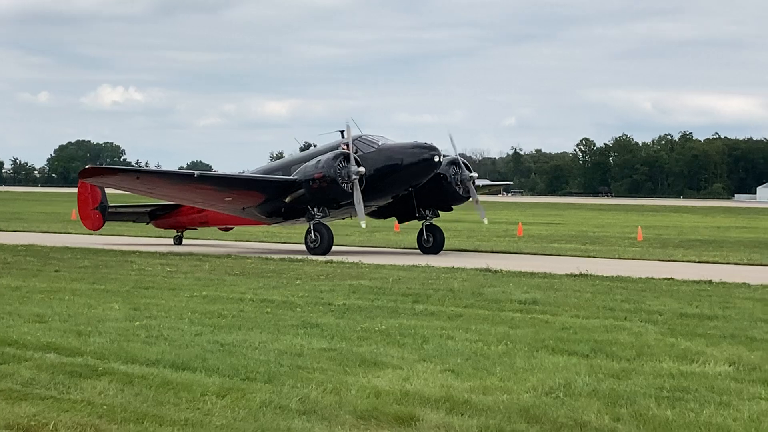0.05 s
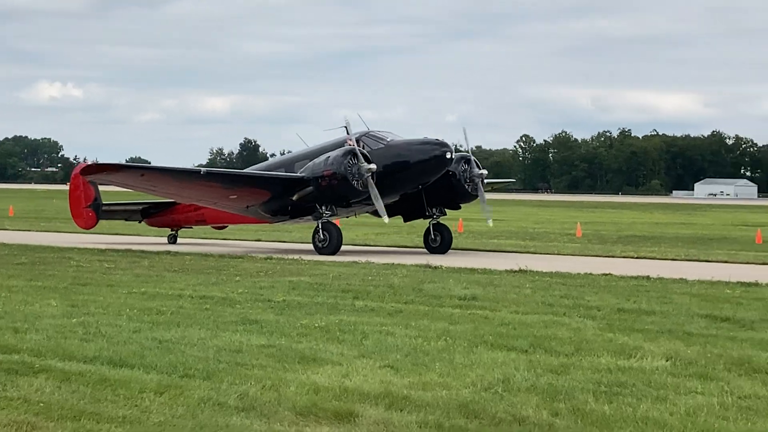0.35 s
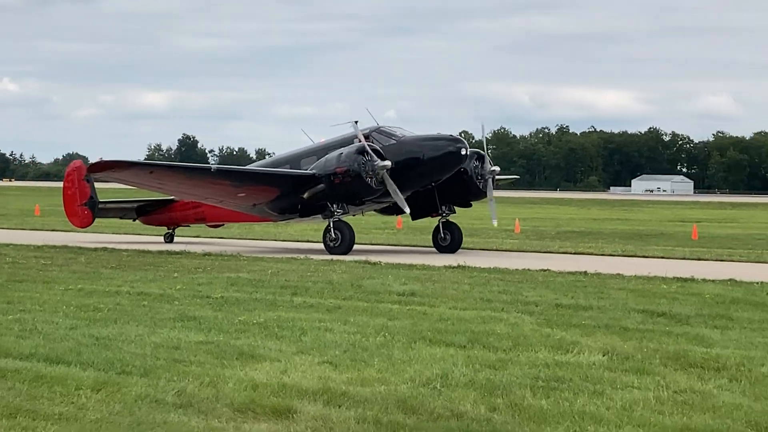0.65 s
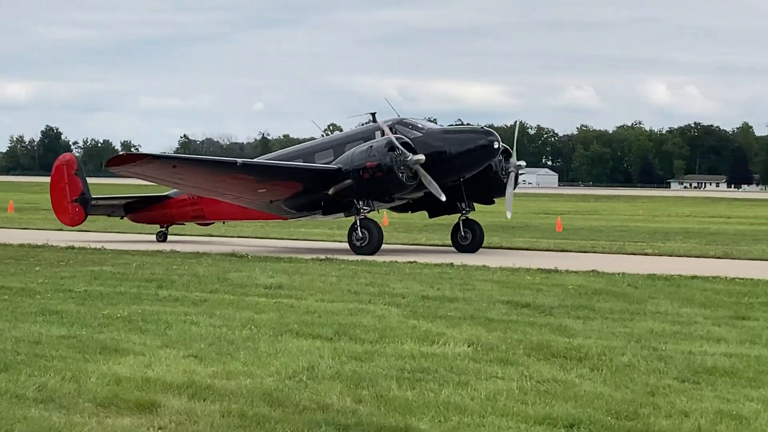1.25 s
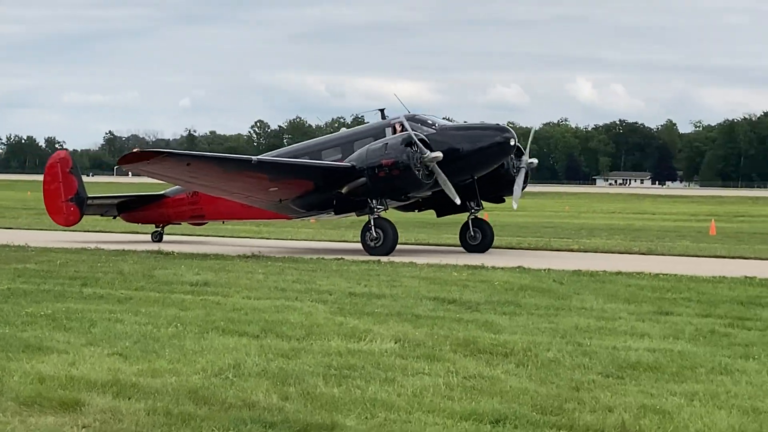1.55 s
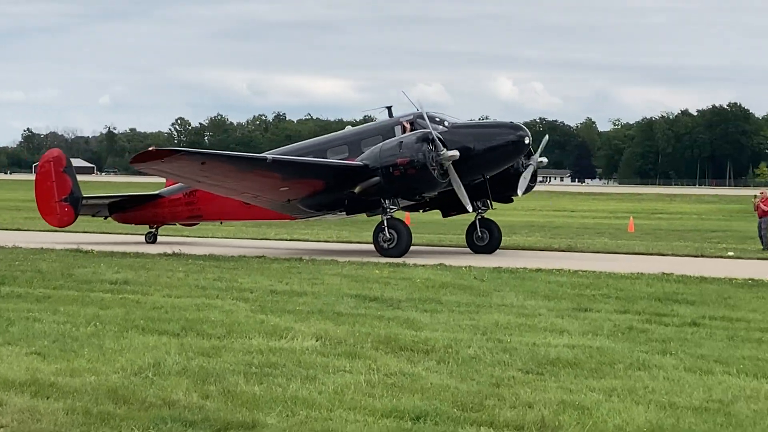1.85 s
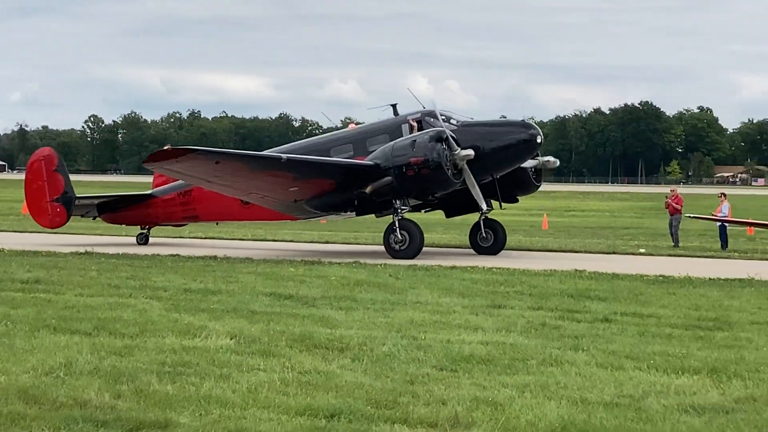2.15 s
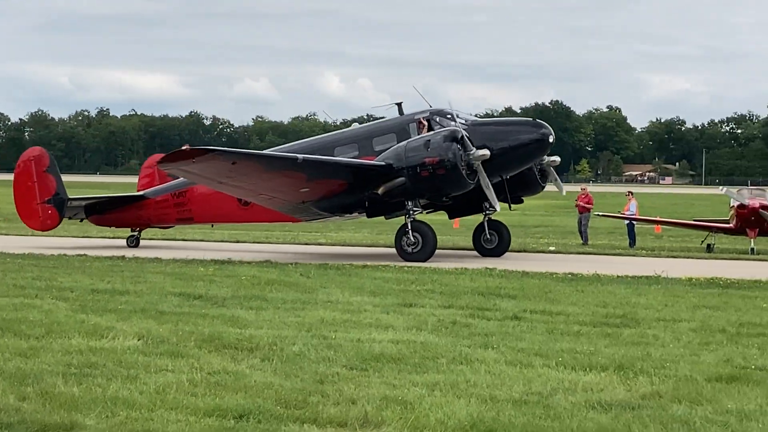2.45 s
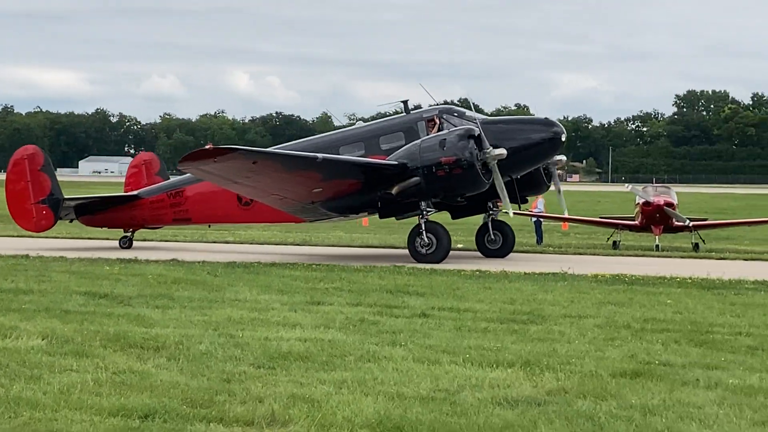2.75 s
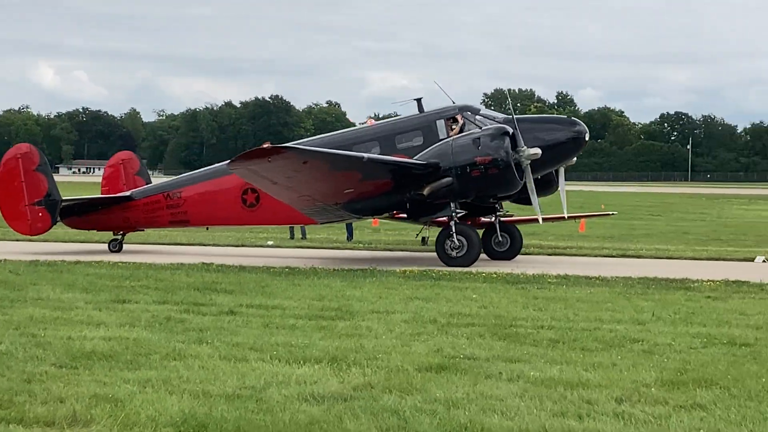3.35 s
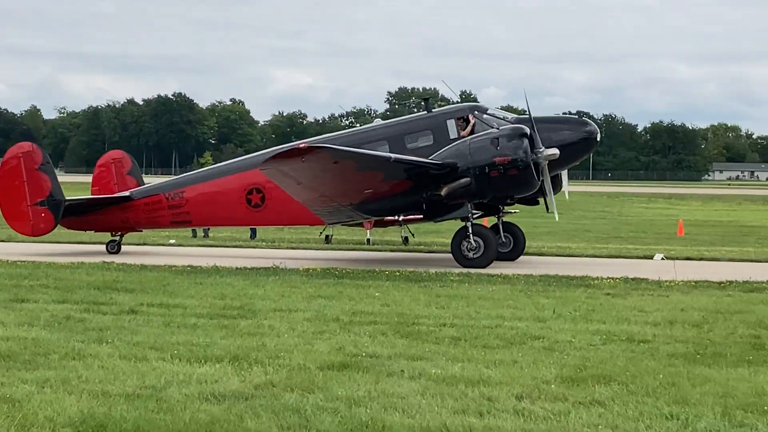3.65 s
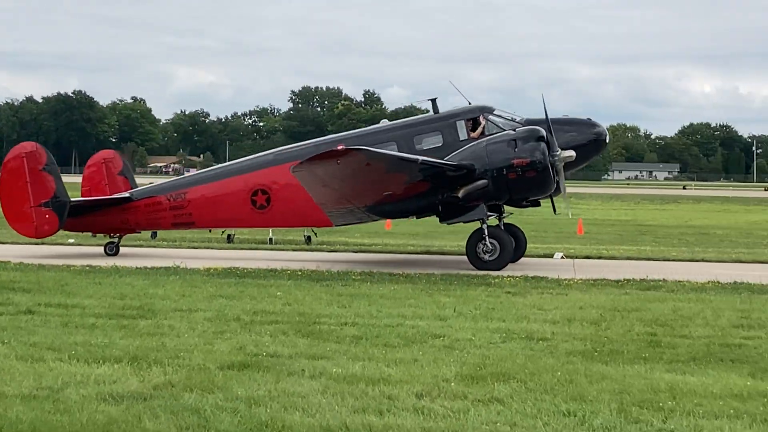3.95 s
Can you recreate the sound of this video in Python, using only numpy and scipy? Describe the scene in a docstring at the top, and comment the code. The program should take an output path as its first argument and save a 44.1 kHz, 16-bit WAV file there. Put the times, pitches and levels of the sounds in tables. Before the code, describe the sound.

A twin-engine propeller plane taxis past, its piston engines rumbling, chuffing and spitting.

```python
"""Two nine-cylinder radial engines idle at different speeds as a propeller aircraft taxis past.
Their uneven exhaust pulses excite pipe resonances and beat into a loping rumble. The near exhaust
chuffs at every firing, and spits and rasps more as its outlet turns towards the microphone.
Behind it the valve gear clatters, loose metal clanks and propeller air washes over the open airfield."""
import sys
import numpy as np
from scipy import signal
from scipy.fft import rfft, irfft, next_fast_len
from scipy.io import wavfile
from scipy.ndimage import uniform_filter1d

SR = 44100
rng = np.random.default_rng(int(sys.argv[2]) if len(sys.argv) > 2 else 0)


def digitize_waveform(pressure):
    """Quantize a signal to 16-bit integers and store it at the path in sys.argv[1].

    Rows of a 2-D input are taken as channels; values are limited to [-1, 1].
    """
    field = np.atleast_2d(pressure).T
    bounded = np.clip(field, -1, 1)
    quanta = np.round(bounded * 32767).astype(np.int16)
    wavfile.write(sys.argv[1], SR, quanta)


N = 176400
T = np.arange(N) / SR
LEAD = SR // 2  # lead-in: the engines are already running
M = next_fast_len(N + 2 * LEAD, True)
HZ = np.fft.rfftfreq(M, 1 / SR)


def amp(db):
    """Decibels to amplitude ratio."""
    return 10 ** (np.asarray(db) / 20)


def unit(x):
    """Normalisation to rms 1."""
    return x / np.sqrt(np.mean(x ** 2) + 1e-20)


def along(points):
    """Interpolation on a logarithmic frequency axis."""
    hz, values = np.transpose(points)
    return np.interp(np.log(HZ + 1), np.log(hz + 1), values)


def noise(spectrum):
    """Spectral shaping: white noise filtered to a given colour."""
    return unit(irfft(rfft(rng.standard_normal(M)) * amp(along(spectrum)), M)[:N])


def stereo_noise(spectrum, side_db):
    """Partial coherence: direct sound is common to both sides, scattered sound differs."""
    return unit(noise(spectrum) + amp(side_db) * np.outer([1, -1], noise(spectrum)))


def narrow_band(hz, width_hz):
    """Modulation: slow noise broadens a sine into a fuzzy metallic tone."""
    fuzz = noise([(0, 0), (width_hz / 2, 0), (width_hz * 2, -30), (width_hz * 10, -80)])
    return unit(fuzz * np.sin(2 * np.pi * np.cumsum(hz + np.zeros(N)) / SR))


def patchy(x, depth_db):
    """Passing resonances: a smooth random gain over frequency and time."""
    frames = signal.stft(x, nperseg=1024)[2]
    swell = uniform_filter1d(rng.standard_normal(frames.shape[1:]), size=7, axis=0)
    swell = unit(uniform_filter1d(swell, size=4, axis=1))
    return unit(signal.istft(frames * amp(depth_db * swell), nperseg=1024)[1][:, :N])


def resonate(x, spectrum):
    """Minimum-phase resonance with the given spectrum; drops the lead-in."""
    cepstrum = irfft(np.log(amp(along(spectrum))), M)
    cepstrum[1:M // 2] *= 2
    cepstrum[M // 2:] = 0
    return irfft(rfft(x, M) * np.exp(rfft(cepstrum)), M)[LEAD:LEAD + N]


def pulses(times, sizes):
    """Impulse train with lead-in, each impulse shared between two samples."""
    at = np.clip(times * SR + LEAD, 0, M - 2)
    i = at.astype(int)
    return np.bincount(i, sizes * (1 - at + i), M) + np.bincount(i + 1, sizes * (at - i), M)


def puffs(times, sizes, rise_s, t60_s):
    """Incoherent addition: the envelope of decaying puffs whose powers sum."""
    t = T[:SR // 4]
    shape = (1 - np.exp(-(t / rise_s) ** 2)) * np.exp(-np.log(1000) * t / t60_s)
    power = signal.fftconvolve(pulses(times, sizes ** 2), (shape / shape.max()) ** 2)
    return np.sqrt(np.abs(power[LEAD:LEAD + N]))


# Engine speeds (time [s], firing rate [Hz])
NEAR_RATE = [(0.0, 46.85), (0.5, 46.27), (1.0, 46.13), (1.5, 45.1), (2.0, 45.35), (2.5, 45.39),
             (3.0, 44.78), (3.5, 45.4), (4.0, 45.38)]
FAR_RATE = [(0.0, 52.95), (0.5, 52.67), (1.0, 52.37), (1.5, 52.62), (2.0, 51.98), (2.5, 51.33),
            (3.0, 51.77), (3.5, 51.26), (4.0, 51.66)]
def firings(rate, cylinders=9):
    """Phase is the integral of rate: each whole cycle gives a firing time and its cylinder."""
    t = np.arange(-LEAD, N) / SR
    cycles = np.cumsum(np.interp(t, *np.transpose(rate))) / SR
    cycles -= cycles[LEAD]
    count = np.arange(np.ceil(cycles[0]), cycles[-1]).astype(int)
    return np.interp(count, cycles, t), count % cylinders


# Spectrum of propeller air (frequency [Hz], relative level [dB])
WASH_SPECTRUM = [(20, -6), (100, -32), (400, -2), (700, -2), (1400, -3.5), (3000, -2.5), (6000, -18),
                 (15000, -48)]
def propeller_wash(level_db=-38, db_per_s=0.24):
    """Diffuse field: the noise of propeller air rises as the aircraft nears."""
    return amp(level_db + db_per_s * (T - T.mean())) * stereo_noise(WASH_SPECTRUM, side_db=-1.5)


# Spectrum of the valve gear (frequency [Hz], relative level [dB])
VALVE_SPECTRUM = [(200, -2.5), (500, -9.5), (800, -11.5), (1000, -2), (1280, 3), (1480, -3), (1700, 2.5),
                  (2100, -10.5), (2400, -6), (2900, -25.5), (4000, -9), (5700, -23), (7700, -21),
                  (10000, -33.5), (15500, -33)]
def valve_clatter(level_db=-35, scatter_db=2, floor=2.7):
    """Impact noise: the valve gear of both engines rattles inside the cowlings."""
    times = np.concatenate([firings(NEAR_RATE)[0], firings(FAR_RATE)[0]])
    sizes = amp(scatter_db * rng.standard_normal(len(times)))
    impacts = unit(puffs(times, sizes, rise_s=0.00064, t60_s=0.056))
    rattle = patchy(stereo_noise(VALVE_SPECTRUM, side_db=-20.5), depth_db=1.2)
    return amp(level_db) * unit(floor + impacts) * rattle


# Knocks of loose metal (time [s], relative peak [dB])
KNOCKS = [(0.829, -39), (0.9372, -36), (1.075, -34), (1.3409, -33), (1.826, -35), (1.885, -30),
          (2.153, -41), (2.4823, -34), (2.7706, -37), (2.929, -28.5), (3.3482, -43)]
def clanks(gain_db=-2):
    """Damped vibration: now and then loose metal rings briefly."""
    times, db = np.transpose(KNOCKS)
    envelope = puffs(times, amp(db), rise_s=0.004, t60_s=0.22)
    return amp(gain_db) * envelope * narrow_band(hz=1720, width_hz=150)


# Midrange spectrum of the exhaust (frequency [Hz], relative level [dB])
RASP_SPECTRUM = [(200, -3), (450, -8.5), (680, 2), (950, -7), (1400, -1), (3000, -40)]
# Growth of the rasp (time [s], level [dB])
RASP_GROWTH = [(0, -66), (2.4, -53), (3.3, -38.5), (4, -38.5)]
def rasp():
    """Directivity: the near exhaust rasps as its outlet comes into view."""
    times = firings(NEAR_RATE)[0]
    envelope = unit(puffs(times, np.ones(len(times)), rise_s=0.0034, t60_s=0.45))
    level = amp(np.interp(T, *np.transpose(RASP_GROWTH)))
    return level * envelope * stereo_noise(RASP_SPECTRUM, side_db=-1)


# Spectrum of escaping gas (frequency [Hz], relative level [dB])
GAS_SPECTRUM = [(300, -6), (1000, -5.5), (2000, 3), (2900, -12.5), (3500, 3), (4100, -3.5), (4700, -3),
                (5400, -5.5), (6100, -13.5), (7800, -3.5), (9000, -1.5), (10200, -15.5), (12500, -22),
                (15500, -21)]
# Hiss of each near cylinder, in firing order (relative level [dB])
CYLINDER_HISS = [8.5, 11, 14.5, 15, 9, 6, 14, 15.5, 16.5]
# Swell and fall of the chuffing (time [s], level [dB])
CHUFF_SWELL = [(0, -42.5), (1, -41), (2, -38.5), (3, -42), (4, -46.5)]
def chuffs(scatter_db=2.5):
    """Pulsed jet noise: gas hisses from the near exhaust at every firing."""
    times, cylinder = firings(NEAR_RATE)
    sizes = amp(np.array(CYLINDER_HISS)[cylinder] + scatter_db * rng.standard_normal(len(times)))
    envelope = unit(puffs(times - .003, sizes, rise_s=0.005, t60_s=0.1))
    level = amp(np.interp(T, *np.transpose(CHUFF_SWELL)))
    return level * envelope * stereo_noise(GAS_SPECTRUM, side_db=-26.5)


def sputter(depth_db=3.5, grain_s=.0008):
    """Intermittent flow: a fast random gain, as gas escapes in tiny uneven bursts."""
    knots = np.arange(0, T[-1], grain_s)
    return unit(amp(depth_db * np.interp(T, knots, rng.standard_normal(len(knots)))))


# Sharp gas bursts (time [s], relative peak [dB], bark re peak [dB], ring frequency [Hz])
SPIT_EVENTS = [(0.078, -27, -8, 3600), (0.187, -29, 0, 3500), (0.464, -31.5, -10, 3700),
               (0.554, -27, -4, 3480), (0.574, -25.5, -1, 3260), (0.8376, -29, -12, 3360),
               (0.8553, -24, -21, 4090), (0.964, -25, -6, 3590), (1.033, -28, -3, 3360),
               (1.248, -21, -7, 3680), (1.3375, -27.5, -11, 3510), (1.735, -28.5, 0, 3370),
               (1.756, -24, -8, 3834), (1.8254, -24.5, -10, 3940), (2.0248, -28.5, -8, 4270),
               (2.043, -24.5, -23, 2310), (2.132, -29, -3, 3550), (2.152, -19, -23, 3480),
               (2.306, -27, -8, 3450), (2.334, -29, -13, 3460), (2.4196, -24.5, -12, 2314),
               (2.548, -19, -20, 3853), (2.6377, -21, -17, 4030), (2.706, -25, -17, 3820),
               (2.7273, -24.5, -15, 3340), (2.819, -26.5, -17, 3580), (2.95, -18, -8, 3600),
               (3.019, -24.5, -14, 3360), (3.0386, -20.5, -1.5, 2250), (3.126, -20.5, -11, 4120),
               (3.2182, -23.5, -3, 3746), (3.262, -26.5, -4, 4010), (3.284, -26.5, -8, 3665),
               (3.3296, -21, -23, 3680), (3.3468, -17.5, -9.5, 3940), (3.396, -25.5, -19, 3980),
               (3.4183, -23.5, -12, 3630), (3.4375, -17.5, -15, 3935), (3.507, -20, -5, 4110),
               (3.5253, -22.5, -21, 4230), (3.5929, -25, -10, 4080), (3.615, -20, -13, 4180),
               (3.682, -23.5, -0.5, 4010), (3.7263, -28, -3, 3260), (3.7442, -17, -0.5, 2450),
               (3.814, -22.5, -5, 3510), (3.8326, -18, -5, 2600), (3.901, -19, -28, 3980),
               (3.9213, -19, -28, 5680), (3.9678, -28.5, -16, 3875), (3.988, -28.5, -14, 4150)]
# Spectrum of the bark (frequency [Hz], relative level [dB])
BARK_SPECTRUM = [(400, -32), (1200, -6), (1800, -10), (2400, 5.5), (3200, 1), (5000, -24), (9000, -28)]
# Modes of the near outlet (frequency [Hz], relative level [dB])
OUTLET_MODES = [(4050, -12), (5650, -26), (7750, -15.5)]
def spits(gas_db=-6, ring_db=-14.5, outlet_db_per_s=4.5, rise_s=0.0033, t60_s=0.063):
    """Transient excitation: some firings spit with a hiss, bark and ring, and excite the outlet's modes."""
    times, db, bark_db, ring_hz = np.transpose(SPIT_EVENTS)
    latest = np.maximum(np.searchsorted(times - .002, T) - 1, 0)  # the spit sounding at each sample
    envelope = puffs(times - .0015, amp(db), rise_s, t60_s)
    bark_envelope = puffs(times - .001, amp(db + bark_db), rise_s, t60_s)
    bark = bark_envelope * stereo_noise(BARK_SPECTRUM, side_db=0)
    ring = envelope * narrow_band(ring_hz[latest], width_hz=280)
    detune = (1 + .025 * rng.standard_normal(len(times)))[latest]
    modes = sum(amp(level) * narrow_band(hz * detune, width_hz=350) for hz, level in OUTLET_MODES)
    drive = amp(db + outlet_db_per_s * (times - T[-1]))
    outlet = puffs(times, drive, rise_s, t60_s=0.057) * modes
    hiss = envelope * sputter() * patchy(stereo_noise(GAS_SPECTRUM, side_db=-23), depth_db=5.5)
    return amp(gas_db) * (hiss + bark) + amp(ring_db) * ring + outlet


def chugs(on_cylinder=7, level_db=-20.5, length_s=.11, start_hz=115, hz_per_s=1000):
    """Linear chirp: once a cycle the near exhaust gives a rising chug, never twice alike."""
    times, cylinder = firings(NEAR_RATE)
    t = T[:int(length_s * SR)]
    envelope = amp(level_db) * np.sin(np.pi * t / length_s)
    out = np.zeros(M)
    for onset in times[cylinder == on_cylinder]:
        size, climb, phase = rng.uniform(-0.97, 1, 3)
        hz = start_hz + hz_per_s * (1 + .5 * climb) * t
        glide = np.sin(2 * np.pi * (np.cumsum(hz) / SR + phase))
        out[int(onset * SR) + LEAD:][:len(t)] += (1 + .5 * size) * envelope * glide
    return out[LEAD:LEAD + N]


# Spectrum of a combustion thump (frequency [Hz], relative level [dB])
THUMP_SPECTRUM = [(20, -40.5), (32, -28), (42, -5), (58, 0.5), (70, -1.5), (97, 6.5), (128, -1.5),
                  (185, -3), (250, -3.5), (310, -8.5), (400, -21.5), (600, -48), (1500, -68)]
def burble(level_db=-21.7, lag_s=0.005825):
    """Cyclic variation: no two firings burn alike, so each adds a thump of random size and lateness."""
    times = np.concatenate([firings(NEAR_RATE)[0], firings(FAR_RATE)[0]])
    size, late = rng.uniform(-1.062, 1, (len(times), 2)).T
    thumps = pulses(times + lag_s * (1 + late), np.sign(size) * np.sqrt(abs(size)))
    return amp(level_db) * unit(resonate(thumps, THUMP_SPECTRUM))


# Cylinder runners in firing order (strength [dB], relative delay [ms], resonance [Hz])
NEAR_RUNNERS = [(-1.5, -4.4, 210), (-4.4, -5.9, 153), (7.9, 4.9, 88), (-4.2, 4.7, 283), (-2.2, 3.8, 151),
                (-5.5, -1, 222), (9.4, 5.7, 84), (-2.9, 5.1, 124), (4.3, 4.3, 117)]
FAR_RUNNERS = [(.3, -5.9, 89), (1.3, -8.4, 169), (2.5, -11.1, 107), (1.5, .9, 78), (.1, -11.3, 51),
               (-5.2, -4.3, 112), (2.2, -10, 135), (.6, -10.3, 138), (-3.6, -15.3, 131)]
# Responses of the common exhaust pipes (frequency [Hz], gain [dB])
NEAR_RESPONSE = [(25, -52.2), (48, -5.6), (66, -31.8), (95, -11.7), (125, -24), (165, -8.4), (220, -20.6),
                 (300, -37.1), (500, -43.7), (900, -44.2)]
FAR_RESPONSE = [(25, -42), (48, 3.3), (66, -19.8), (95, -11.3), (125, -14.7), (165, -34), (220, -26.4),
                (300, -35.4), (500, -34.7)]
def exhaust(rate, runners, pipe, scatter_db, q=3):
    """Resonators in series: each firing's pressure pulse rings its own runner, then the common pipe."""
    times, cylinder = firings(rate)
    sizes = amp(scatter_db * rng.standard_normal(len(times)))
    collector = 0
    for k, (db, delay_ms, hz) in enumerate(runners):
        pressure = pulses(times[cylinder == k] + delay_ms / 1000, sizes[cylinder == k])
        ratio = HZ / hz
        collector += amp(db) * rfft(pressure) / (1 - ratio ** 2 + 1j * ratio / q)
    return resonate(irfft(collector, M), pipe)


def scene(approach_db_per_s=0.22):
    """Superposition: two firing rates beat in a rumble that grows as the aircraft draws level."""
    near = amp(42) * exhaust(NEAR_RATE, NEAR_RUNNERS, NEAR_RESPONSE, scatter_db=0.33)
    far = amp(41) * exhaust(FAR_RATE, FAR_RUNNERS, FAR_RESPONSE, scatter_db=2.1)
    rumble = amp(approach_db_per_s * (T - T.mean())) * (near + far + burble() + chugs())
    return rumble + chuffs() + spits() + valve_clatter() + clanks() + rasp() + propeller_wash()


# Level difference of the microphone ports (frequency [Hz], left minus right [dB])
PORT_BALANCE = [(60, -1), (380, 0), (700, -1.5), (1290, 0.5), (1800, -0.5), (2400, 5.5), (4000, 1),
                (15000, -1)]
# Phase difference of the ports (frequency [Hz], lead of left [rad])
PORT_PHASE = [(100, -.1), (600, -.2), (1460, 0), (2500, 1.5), (3700, 0), (5080, .9), (6720, .6),
              (7600, -1.9), (9250, -3.14), (11000, -6.2), (12200, -7.2), (13600, -9.4), (15500, -12.6)]
def record(dry, top_hz=15900):
    """Stereo pickup: two band-limited microphone ports differ in level and phase."""
    half = np.array([[.5], [-.5]])
    ports = amp(half * along(PORT_BALANCE)) * np.exp(1j * half * along(PORT_PHASE))
    return irfft(rfft(dry, M) * ports * (HZ < top_hz), M)[:, :N]


dry = scene()
out = record(dry)
digitize_waveform(out)
```